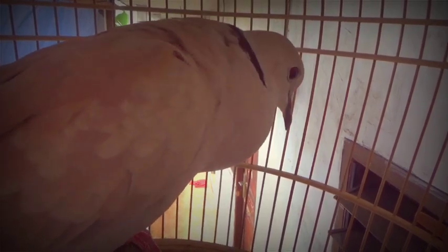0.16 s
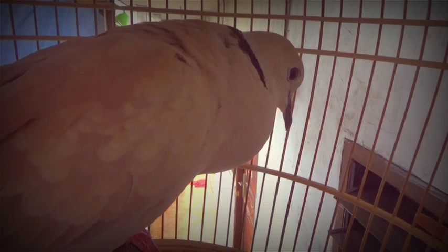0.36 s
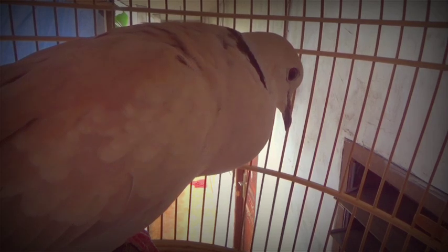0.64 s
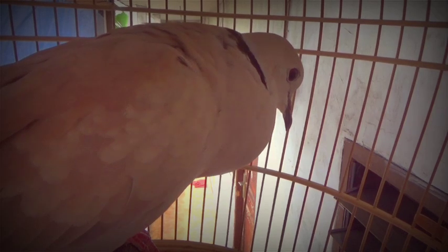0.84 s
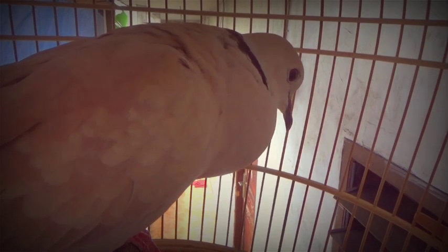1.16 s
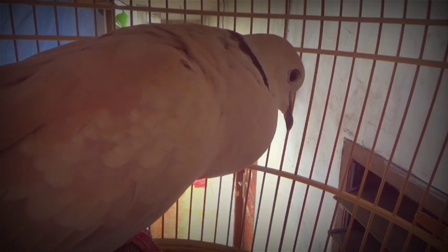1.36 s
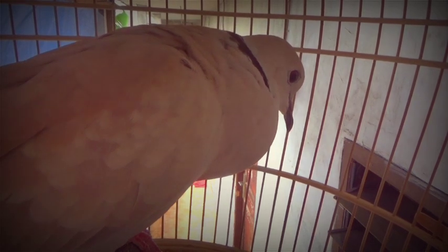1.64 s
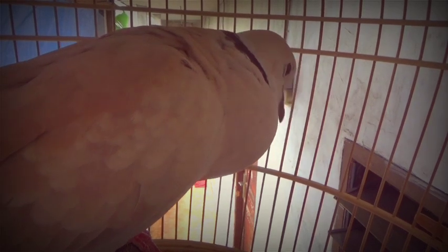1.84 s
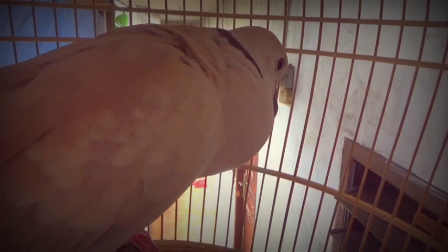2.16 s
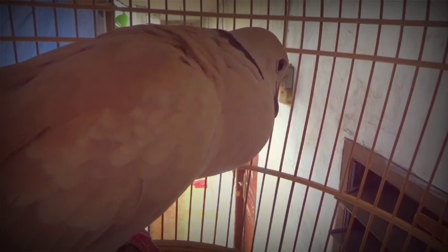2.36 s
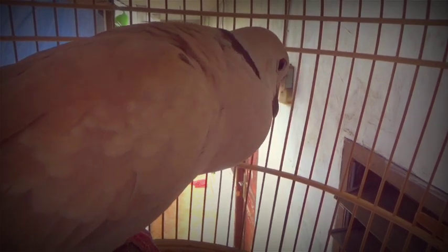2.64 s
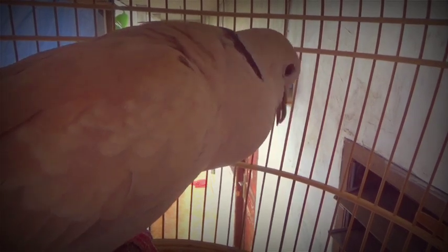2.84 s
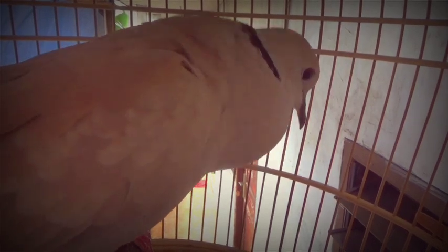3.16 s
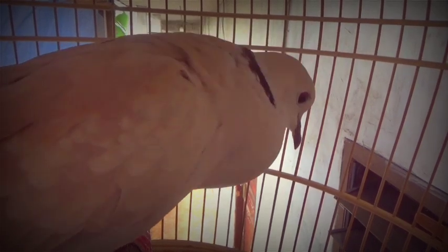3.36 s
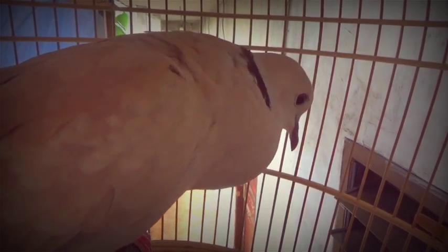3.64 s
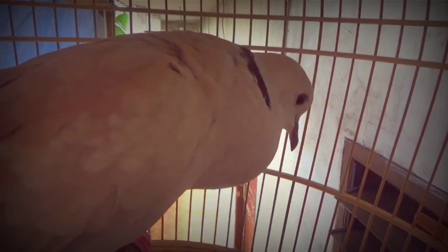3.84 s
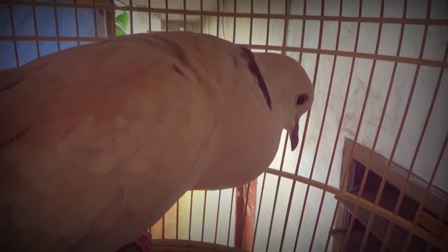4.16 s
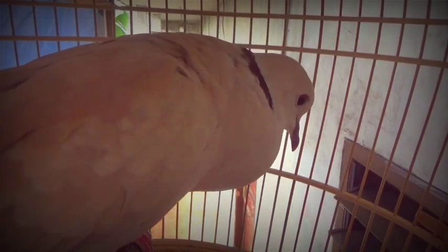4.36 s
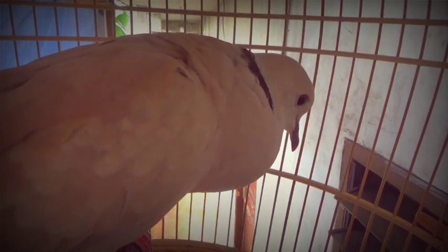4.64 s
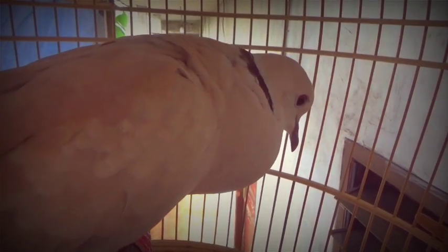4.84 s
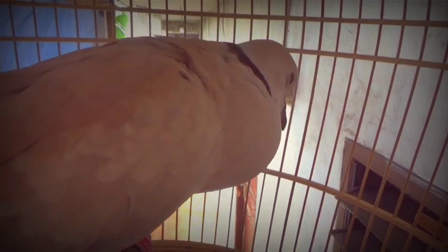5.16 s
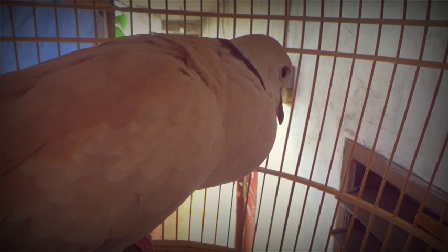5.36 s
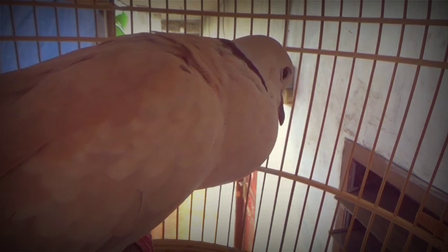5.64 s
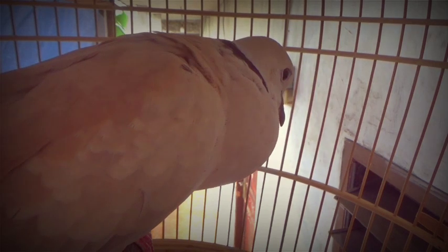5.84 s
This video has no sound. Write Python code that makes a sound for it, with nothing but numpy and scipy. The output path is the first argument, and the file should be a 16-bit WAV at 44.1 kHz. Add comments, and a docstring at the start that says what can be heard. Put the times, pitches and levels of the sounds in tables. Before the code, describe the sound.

Very close to a stereo microphone in a hard-walled room, a caged dove throbs through a quick trill, then holds a long, hollow coo that slowly sinks and drops. A nasal, wavering, raspy in-breath follows, then a brief coo, another trill and a second long sinking note. Further off, a harsher bird screeches early on and small birds chirp. Small claw clicks, a faint steady tick and low room rumble lie underneath.

```python
"""A caged dove coos very close to a stereo pickup in a hard-walled room. A trill of short pulses, each a near sine
with a ringing crop, runs into a long pure note that sinks and drops; a nasal, wavering in-breath follows as a low
buzz through throat resonances with rasp and hiss. Further off, birds chirp and a harsher one screeches, made of
gliding partials with air noise. Noise-burst claw clicks, a feather rustle and a faint steady tick sound over room
noise and rumble made from bands of noise; a limiter holds the peaks."""
import sys
import numpy as np
from scipy import signal
from scipy.fft import rfft, irfft, next_fast_len
from scipy.io import wavfile
from scipy.ndimage import uniform_filter1d, minimum_filter1d

SR = 44100
rng = np.random.default_rng(int(sys.argv[2]) if len(sys.argv) > 2 else 0)


def ratio(d):
    """dB to gain"""
    e = np.asarray(d, float) / 20
    return 10 ** e


def wrap_up_sound(samples):
    """Save the sound to the file named by the first command line argument, as 16-bit audio."""
    columns = np.atleast_2d(samples).T
    # keep every value between -1 and 1, then stretch to whole-number steps
    tamed = np.clip(columns, -1, 1)
    steps = np.round(tamed * 32767).astype(np.int16)
    wavfile.write(sys.argv[1], SR, steps)


N = 264908
SIDES = np.array([[.5], [-.5]])   # left, right: splits a difference evenly between the channels


def rms_one(x):
    """Scales to an rms of 1."""
    return x / np.sqrt(np.mean(x ** 2) + 1e-20)


def in_time(rows):
    """Straight lines between the rows, one track for each column after the time."""
    s, *columns = np.transpose(rows)
    return [np.interp(np.arange(N) / SR, s, column) for column in columns]


def at_hz(points, hz):
    """Reads a curve at hz, along a logarithmic frequency axis."""
    points = np.array(points)
    return np.interp(np.log(hz), np.log(points[:, 0]), points[:, 1])


def gate(start, stop, rise, fall):
    """Rises smoothly from start, falls smoothly after stop."""
    t = np.arange(N) / SR
    ramp = np.minimum((t - start) / rise, (stop - t) / fall + 1)
    return np.sin(np.pi / 2 * np.clip(ramp, 0, 1)) ** 2


def drift(rate, size=N):
    """Slow chance with an rms of 1: noise through two equal low-pass poles at rate Hz."""
    r = np.exp(-2 * np.pi * rate / SR)
    slow = signal.lfilter([1], [1, -2 * r, r * r], rng.standard_normal(size + 4000))
    return rms_one(slow[4000:])


def resonance(x, hz, width_hz):
    """Two-pole ringing filter with a gain near 1 on top."""
    r = np.exp(-np.pi * width_hz / SR)
    zeros = np.array([1, 0, -1]) * (1 - r * r) / 2
    return signal.lfilter(zeros, [1, -2 * r * np.cos(2 * np.pi * hz / SR), r * r], x + 1e-18)


def twice_resonant(x, hz, width_hz):
    """The same resonance passed twice, for steeper skirts; rms 1."""
    return rms_one(resonance(resonance(x, hz, width_hz), hz, width_hz))


def hump(hz, centre_hz, width_hz):
    """Complex gain of a resonance at hz."""
    return 1 / (1 + 1j * (hz ** 2 - centre_hz ** 2) / (hz * width_hz))


# the pure tone off the nearby walls: pitch_hz, left_minus_right_db, left_lead_rad
WALL_SHIFTS = [(404, -1.4, 0.19), (420, -0.7, 0.19), (445, -1.4, 0.14), (465, -1.5, 0.03),
               (482, -1.5, 0.01), (495, -1.0, 0.01), (507, -0.2, -0.1), (522, -0.4, -0.25),
               (532, -1.1, -0.36), (540, -2.0, -0.43), (550, -3.2, -0.4), (562, -5.8, -0.3)]


def fundamental(hz, level_db, on, phase):
    """A near sine from the syrinx; the swollen crop rings on after stops and jumps in pitch."""
    crop_hz, crop_t60_s = 420, .059
    crop_width_hz = np.log(1000) / np.pi / crop_t60_s
    crop_gain = abs(1 + hump(hz, crop_hz, crop_width_hz))
    level = ratio(level_db + .31 * drift(17)) / crop_gain   # keeps the steady level as listed
    wall_hz, difference_db, lead_rad = np.transpose(WALL_SHIFTS)
    panning = ratio(SIDES * np.interp(hz, wall_hz, difference_db))
    tone = np.sin(phase + SIDES * np.interp(hz, wall_hz, lead_rad))
    syrinx = np.sqrt(2) * on * level * panning * tone
    return syrinx + resonance(syrinx, crop_hz, crop_width_hz)


# throat resonances for the upper partials: centre_hz, width_hz (of the plain resonance), level_db (relative)
THROAT_RESONANCES = [(2145, 130, 1), (3230, 130, -3.5), (3980, 230, -13), (5170, 380, 1),
                     (6400, 300, -18.5), (9450, 540, -15.5)]


def upper_partials(hz, phase, since_start_s):
    """Partials 4 to 19 shaped by fixed throat resonances and one that sinks while a note lasts."""
    sinking_hz = 8800 - 1600 * since_start_s
    upper = 0
    for k in range(4, 20):
        colour = ratio(-11.5) * abs(hump(k * hz, sinking_hz, 400)) ** 2
        for centre, width, db in THROAT_RESONANCES:
            colour = colour + ratio(db) * abs(hump(k * hz, centre, width)) ** 1.4
        offset = rng.uniform(0, 2 * np.pi) + rng.normal(0, .43) * SIDES
        upper = upper + colour * ratio(1.3 * drift(47)) * np.sin(k * phase + offset)
    return upper


# tone gets richer towards high pitch, levels before drift and panning:
# pitch_hz, second_partial_db, nasal_resonance_db, upper_partials_db (all relative to the fundamental)
RICHNESS = [(410, -39, -42, -59), (470, -40.5, -44.5, -60.5), (500, -36, -38, -50), (517, -29, -34, -46),
            (534.4, -30, -32.5, -42), (590, -29.5, -26, -42.5)]


def overtones(hz, level_db, on, phase, since_start_s):
    """Second partial, nasal resonance and upper partials, each following pitch and level."""
    rich_hz, *shares_db = np.transpose(RICHNESS)
    second_db, nasal_db, upper_db = [level_db + np.interp(hz, rich_hz, db) + 1.2 * drift(5.2)
                                     for db in shares_db]
    second = ratio(second_db) * np.sin(2 * phase + [[.4], [-.6]]) * ratio([[2.5], [-3]])
    # the nasal resonance lifts whichever partial is near
    nasal = sum(abs(hump(k * hz, 1630, 300)) ** 2 * np.sin(k * phase + .5 * SIDES) for k in range(3, 5))
    upper = upper_partials(hz, phase, since_start_s)
    return np.sqrt(2) * on * (second + ratio(nasal_db) * nasal + ratio(upper_db) * upper)


def coo_breath(level_db, on):
    """Air noise around the crop's pitch that grows with effort."""
    air = twice_resonant(rng.standard_normal(N), 420, 130)
    return on * ratio(-36.5 + .21 * (level_db + 3)) * air


# trill pulses: start_s, length_s, first_pitch_hz, settled_pitch_hz, settled_level_db (of the fundamental)
TRILL_PULSES = [(0.029, .018, 504.9, 433.2, -22), (0.078, .017, 435.1, 409.9, -7),
                (0.129, .047, 470, 420, -8.5), (0.203, .015, 491.4, 500.6, -7),
                (3.83, 0.0055, 444.7, 457.4, -18.5), (3.866, .012, 420, 420, -6),
                (3.913, .014, 441.2, 457.4, -4), (3.962, .037, 468.5, 493.2, -9.5)]
# one list of rows per held note, the first two entered by a low scoop: time_s, pitch_hz, fundamental_level_db
HELD_NOTES = [
    [(.218, 467, -10), (.235, 410.4, -8.5), (.256, 418.2, -8), (.272, 477.4, -4), (.284, 564, -15),
     (.33, 566.4, -15), (.42, 553.1, -14.5), (.62, 547.7, -12), (.95, 546.3, -10), (1.5, 530, -7),
     (1.92, 507.5, -6), (2.06, 485.5, -5), (2.12, 453, -4), (2.136, 405.2, -8), (2.165, 406.8, -10),
     (2.3, 406.7, -10), (2.43, 399.7, -11.5), (2.45, 400.4, -21)],
    [(3.219, 383.6, -2.5), (3.24, 451.2, -6), (3.252, 554, -14.5), (3.3, 550.5, -15), (3.4, 532.4, -12),
     (3.415, 526.6, -16.5)],
    [(4.033, 500, -7), (4.075, 492.3, -8.5), (4.115, 553.2, -13.5), (4.14, 553.5, -15.5),
     (4.25, 541.3, -12.5), (4.4, 537.9, -10.3), (4.8, 539.4, -9.5), (5.28, 538.3, -8), (5.42, 531, -6),
     (5.7, 505.1, -5), (6.0, 481.3, -5.5)],
]


def coo():
    """Trill pulses and held notes as one voice: fundamental, overtones and breath share one gate."""
    kick_s, kick_db = .017, 6   # a pulse starts louder and settles
    pulses = [[(s, first_hz, db + kick_db), (s + min(kick_s, length), settled_hz, db),
               (s + length, settled_hz, db)]
              for s, length, first_hz, settled_hz, db in TRILL_PULSES]
    soundings = sorted(pulses + HELD_NOTES, key=lambda rows: rows[0][0])
    hz, level_db = uniform_filter1d(in_time(np.concatenate(soundings)), size=200)
    on = np.minimum(sum(gate(rows[0][0], rows[-1][0], .007, .0066) for rows in soundings), 1)
    phase = 2 * np.pi * np.cumsum(hz * (1 + .00093 * drift(26))) / SR
    t = np.arange(N) / SR
    starts = np.array([0] + [rows[0][0] for rows in HELD_NOTES])
    since_start_s = t - starts[np.searchsorted(starts, t, side="right") - 1]
    return (fundamental(hz, level_db, on, phase) + coo_breath(level_db, on)
            + overtones(hz, level_db, on, phase, since_start_s))


# in-breath note: time_s, pitch_hz, low_resonance_db, upper_resonance_db (before flutter)
INBREATH_TRACK = [(2.5, 209.7, -18.5, -36.5), (2.546, 226.8, -19, -43), (2.573, 238, -13.5, -50),
                  (2.64, 248, -17, -34), (2.745, 226.3, -25.5, -24.5), (2.821, 214, -24.5, -19.5),
                  (2.896, 219.7, -25.5, -9.5), (2.96, 202.7, -28, -7), (3.0, 184.6, -29, -15),
                  (3.03, 175.3, -34, -14.5), (3.08, 163.9, -35, -19.5), (3.1, 154, -48, -42)]


def inbreath_buzz():
    """Low unsteady partials lifted by two throat resonances with a weak skirt around them."""
    hz, low_db, upper_db = in_time(INBREATH_TRACK)
    phase = 2 * np.pi * np.cumsum(hz * (1 + .006 * drift(30) + .012 * drift(120))) / SR
    partial_hz = np.arange(2, 12)[:, None] * hz
    low = abs(hump(partial_hz, 399, 91)) ** 4.7
    gains = ratio(low_db) * low / np.linalg.norm(low, axis=0)
    gains = gains + ratio(upper_db) * abs(hump(partial_hz, 810, 132)) ** 2.85
    gains = gains + ratio(-41) * abs(hump(partial_hz, 690, 310)) ** 1.8   # skirt
    buzz = ratio(-39) * np.sin(phase)
    for k, gain in enumerate(gains, start=2):
        buzz = buzz + gain * ratio(1.7 * drift(41)) * np.sin(k * phase)
    start, stop = INBREATH_TRACK[0][0], INBREATH_TRACK[-1][0]
    return gate(start, stop, .031, .013) * np.sqrt(2) * buzz


# throat rings excited by air noise: centre_hz, width_hz (of each of two passes), level_db (relative)
RASP_RINGS = [(625, 73, -14.5), (802, 62, -3.5), (720, 970, -14)]


def inbreath_rasp(air):
    """Fluttering air noise ringing in the throat between the partials."""
    rings = sum(ratio(db) * twice_resonant(air, centre, width) for centre, width, db in RASP_RINGS)
    return gate(INBREATH_TRACK[0][0], 3.16, .18, .03) * ratio(-36 + 3.6 * drift(13)) * rings


# whistles in the hiss: first_hz, last_hz, drift_rate_hz (sets the width), level_db (relative)
HISS_WHISTLES = [(5100, 5450, 170, 3), (6250, 6750, 90, -8), (7950, 9000, 140, 0), (9600, 10100, 120, -6),
                 (11000, 12200, 120, -14), (14000, 13300, 90, -14)]


def inbreath_hiss(air):
    """Broad air noise with narrow whistling bands, each a gliding carrier under slow chance."""
    along = np.clip((np.arange(N) / SR - 2.6) / .45, 0, 1)
    hiss = ratio(-5.5) * rms_one(resonance(air, 4500, 5000))
    for first_hz, last_hz, rate, db in HISS_WHISTLES:
        carrier = np.exp(2j * np.pi * np.cumsum(first_hz + (last_hz - first_hz) * along) / SR)
        hiss = hiss + ratio(db) * ((drift(rate) + 1j * drift(rate)) * carrier).real
    return gate(2.58, 2.98, .082, .09) * ratio(-56) * hiss


def inbreath():
    """A nasal wavering buzz with rasp and hiss made from the same air."""
    air = rng.standard_normal(N)
    return inbreath_buzz() + inbreath_rasp(air) + inbreath_hiss(air)


def bird_notes(notes, partials_db, breath_db):
    """Gliding notes with overtones and air noise; harshness shakes pitch and level."""
    out = np.zeros(N)
    for start, stop, first_hz, last_hz, db, harsh in notes:
        at = round(start * SR)
        size = min(round((stop - start + .014) * SR), N - at)
        t = np.arange(size) / SR
        glide_hz = first_hz + (last_hz - first_hz) * t / (stop - start)
        roughness = .12 * harsh * (1 + 1.2 * np.exp(-t / .0072))   # roughest at the onset
        phase = 2 * np.pi * np.cumsum(glide_hz * (1 + roughness * drift(500, size=size))) / SR
        shape = np.clip(np.minimum(t / .0035, (stop - start - t) / .0036 + 1), 0, 1)
        shape = shape * ratio(db + 11 * harsh * drift(120, size=size))
        tone = sum(ratio(p) * np.sin(k * phase) for k, p in enumerate(partials_db, start=1)
                   if k * first_hz < .4 * SR)
        air = resonance(rng.standard_normal(size), min(2.4 * first_hz, 9500), 14000)
        out[at:at + size] += shape * (tone + ratio(breath_db) * air)
    return out


# small birds' chirps, and some high and inharmonic partials of the harsher bird's screech (1.15 and 1.65 s):
# start_s, stop_s, first_hz, last_hz, level_db (before partials and distance), harshness (0-1)
CHIRP_NOTES = [(.03, .075, 4800, 4836, -39, .05), (1.15, 1.175, 14440, 14320, -43.5, .03),
               (1.647, 1.68, 3410, 3334, -30, .25), (1.647, 1.67, 3950, 3953, -26, .3),
               (1.655, 1.69, 4250, 4365, -29, 0.2), (1.65, 1.68, 5990, 6010, -34, .4),
               (3.548, 3.585, 3550, 3930, -30, .14), (3.59, 3.62, 3640, 3750, -35, .15),
               (3.622, 3.675, 4140, 4295, -29.5, .05), (3.70, 3.735, 3900, 3536, -30.5, .17),
               (3.832, 3.87, 3390, 3530, -32, 0.05), (5.565, 5.6, 3730, 3900, -30.5, 0.3),
               (5.63, 5.68, 3770, 3846, -33, .1), (5.70, 5.75, 3843, 3815, -44, 0.05)]
# level of each partial from the first up: level_db (relative)
CHIRP_PARTIALS = [5, -12, -18]


def chirps():
    """Small birds' chirps and some extra screech partials, strongest at the first partial, little air."""
    return bird_notes(CHIRP_NOTES, CHIRP_PARTIALS, breath_db=-24)


# a harsher bird: start_s, stop_s, first_hz, last_hz, level_db (before partials and distance), harshness (0-1)
HARSH_BIRD = [(1.144, 1.17, 2856, 2674, -21, .3), (1.15, 1.18, 2543, 2620, -17, .1),
              (1.506, 1.532, 2757, 2607, -28, .6), (1.53, 1.605, 2509, 2652, -13.5, .13),
              (1.603, 1.63, 3164, 3094, -18, 0.22), (1.605, 1.652, 2600, 2695, -18, .25)]
# level of each partial from the first up: level_db (relative)
HARSH_BIRD_PARTIALS = [-6.5, 3.5, -3.5, -14, -25]


def screeches():
    """A harsher bird's notes, strongest at the second partial with more air."""
    return bird_notes(HARSH_BIRD, HARSH_BIRD_PARTIALS, breath_db=-11.5)


# claws and bars: time_s, level_db (before the mix of ring and noise), pitch_hz
CAGE_CLICKS = [(1.9961, -35.5, 2550), (2.4037, -38.5, 2530), (2.5232, -43, 3560), (2.6379, -38.5, 5220),
               (3.2275, -40, 2850), (3.2994, -31, 6930), (3.3518, -34, 6910), (4.2333, -39, 3200),
               (4.401, -37.5, 3050), (4.5189, -37.5, 2510), (4.8574, -42, 3230), (5.1502, -34, 6610),
               (5.2597, -31, 2720)]


def clicks():
    """Dry little taps: a burst of noise with a short ring."""
    out, t = np.zeros(N), np.arange(400) / SR
    for s, db, hz in CAGE_CLICKS:
        at = round(s * SR)
        ring = .5 * np.sin(2 * np.pi * hz * t)
        burst = .9 * resonance(rng.standard_normal(400), 5500, 7000)
        out[at:at + 400] += ratio(db - 60 * t / .041) * (ring + burst)
    return out


def rustle():
    """Feathers brush the bars: a short soft burst of bright noise."""
    start_s, length_s = 4.83, .05
    bright = rms_one(resonance(rng.standard_normal(N), 3800, 5000))
    return gate(start_s, start_s + length_s, .02, .02) * ratio(-50 + 3 * drift(150)) * bright


# faint tick: time_s, peak_level_db (before drift)
TICK_LEVEL = [(0, -53), (1.1, -44.5), (2.3, -53), (2.6, -47.5), (4.2, -54.5), (4.6, -53), (6, -61.5)]


def tick():
    """A faint regular tick: 25 short pulses a second, each ringing at 3570 Hz."""
    per_s, offset_s = 25, .0145
    t = (np.arange(N) / SR - offset_s) % (1 / per_s)
    pulse = np.exp(-((t - .002) / .0034) ** 2) * np.sin(2 * np.pi * 3570 * t)
    return ratio(in_time(TICK_LEVEL)[0] + 2 * drift(13)) * pulse


def room(x):
    """Hard walls: ten feedback delays a side, duller on every round."""
    t60_s, wall_cut_hz = .38, 12000   # decay time at low frequency; it halves at the cut
    size = next_fast_len(N + SR)
    hz = np.arange(size // 2 + 1) * SR / size
    t60 = t60_s / (1 + (hz / wall_cut_hz) ** 2)
    wet = []
    for lags in rng.uniform(.011, .043, (2, 10)):
        rounds = [ratio(-60 * lag / t60) * np.exp(-2j * np.pi * hz * lag) for lag in lags]
        wet.append(sum(g / (1 - g) for g in rounds) / 4)
    shared = .72 * wet[0] + .42 * wet[1] * [[1], [-1]]   # common part plus a part opposed left and right
    return irfft(rfft(x, size) * shared, size)[:, :N]


# stereo likeness of the background: frequency_hz, left_right_likeness (1 = the same)
STEREO_LIKENESS = [(90, 1), (140, 0.17), (290, 0.6), (640, 0.14), (1400, 0.32), (3100, 0.85), (6800, 0.88),
                   (15000, 0.77)]


def banded_noise(spectrum, patchy_db):
    """Half-octave bands of stereo noise, each with its own level, flicker and likeness; rms 1."""
    lowest, highest = spectrum[0][0], spectrum[-1][0]
    edges = lowest * 2 ** np.arange(0, np.log2(highest / lowest) + .3, .5)
    white = rng.standard_normal((2, 2, N))
    out = 0
    for k, (low, high) in enumerate(zip(edges, edges[1:])):
        band = signal.butter(2, [low, min(high, .45 * SR)], "band", fs=SR, output="sos")
        mid, side = signal.sosfilt(band, white[k % 2])
        hz = np.sqrt(low * high)
        alike = np.clip(at_hz(STEREO_LIKENESS, hz), -1, 1)
        stereo = np.sqrt(1 + alike) * mid + np.sqrt(1 - alike) * side * [[1], [-1]]
        out = out + ratio(at_hz(spectrum, hz) + patchy_db * drift(25)) * stereo
    return rms_one(out)


# background: time_s, room_noise_level_db, rumble_level_db (before its left-right balance)
BACKGROUND_LEVEL = [(0, -38, -35.5), (1.1, -37, -34), (1.7, -37, -30), (2.3, -44.5, -42), (2.8, -36, -35.5),
                    (3.4, -41, -39), (4.2, -39.5, -37), (4.8, -36.5, -31.5), (5.5, -34.5, -31),
                    (6, -40, -35)]
# room noise spectrum: frequency_hz, density_db_per_hz (relative)
ROOM_SPECTRUM = [(88, -26.5), (150, -13), (404, -7), (572, -11), (656, -19), (1290, -23), (1510, -25.5),
                 (2310, -26), (2760, -45.5), (3480, -29.5), (3980, -31.5), (15500, -45.5)]
# rumble spectrum: frequency_hz, density_db_per_hz (relative)
RUMBLE_SPECTRUM = [(12, -42.5), (20, -26), (72, 0), (97, 9), (119, 4.5), (167, -9), (188, -12), (226, -8.5),
                   (260, -10), (340, -41), (570, -120)]


def background():
    """Room noise and a low rumble, stronger on the left, both rising and falling slowly."""
    noise_db, rumble_db = in_time(BACKGROUND_LEVEL)
    noise = ratio(noise_db) * banded_noise(ROOM_SPECTRUM, patchy_db=1.5)
    rumble = ratio(rumble_db) * banded_noise(RUMBLE_SPECTRUM, patchy_db=3) * ratio([[1.8], [-2.5]])
    return noise + rumble


def scene():
    """The dove close up, the other birds further off, and the room around them."""
    dove = coo() + inbreath()
    far = chirps() + screeches()
    wet = room(far + ratio(-12.5) * dove.mean(axis=0))
    return dove + ratio([[-5], [-7]]) * far + wet + clicks() + rustle() + tick() + background()


def band_limit(x):
    """A steep low-pass at the top of the band."""
    return signal.sosfilt(signal.butter(12, 15840, fs=SR, output="sos"), x)


def record(dry):
    """A limiter turns the level down around peaks over its ceiling and lets it recover steadily."""
    ceiling_db, release_db_per_s = -1, 50
    over_db = np.maximum(20 * np.log10(abs(dry).max(axis=0) + 1e-9) - ceiling_db, 0)
    slope = release_db_per_s * np.arange(N) / SR
    held_db = np.maximum.accumulate(over_db + slope) - slope
    held_db = uniform_filter1d(-minimum_filter1d(-held_db, size=180), size=180)   # acts just ahead of each peak
    mix = dry * ratio(-held_db)
    return band_limit(mix)


dry = scene()
out = record(dry)
wrap_up_sound(out)
```